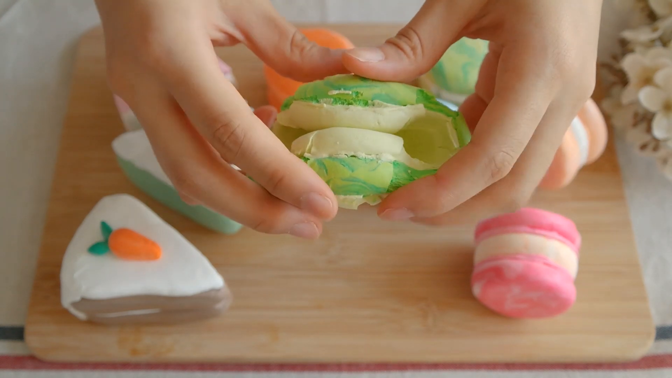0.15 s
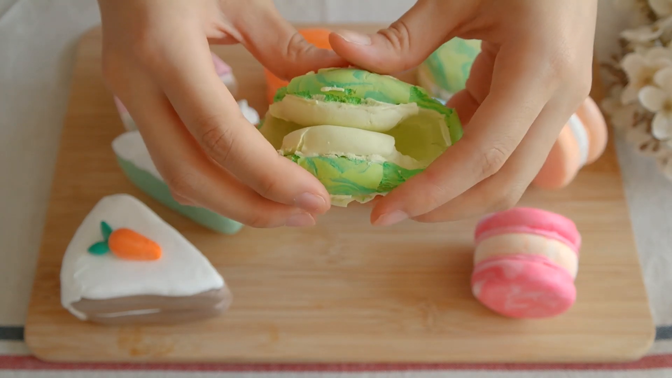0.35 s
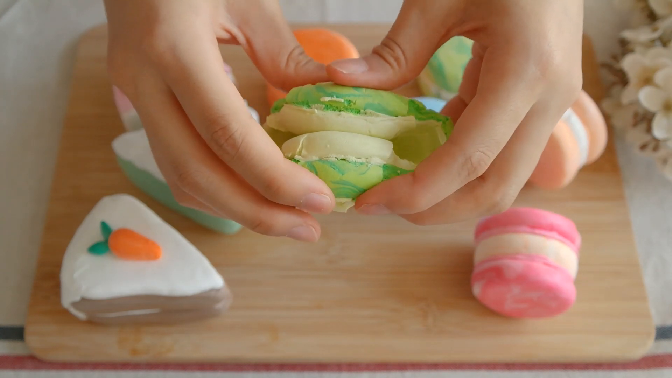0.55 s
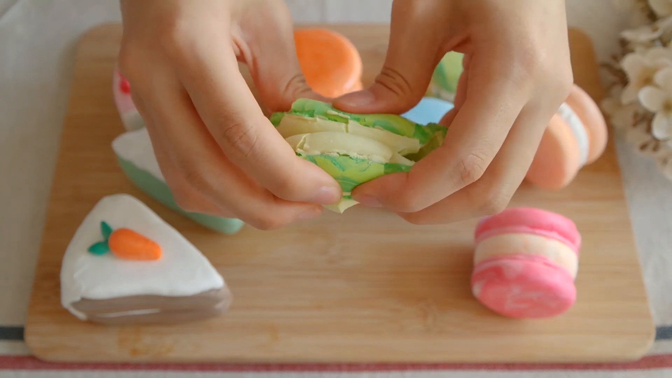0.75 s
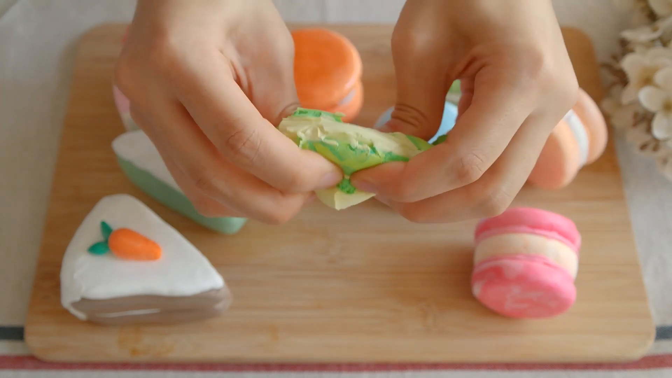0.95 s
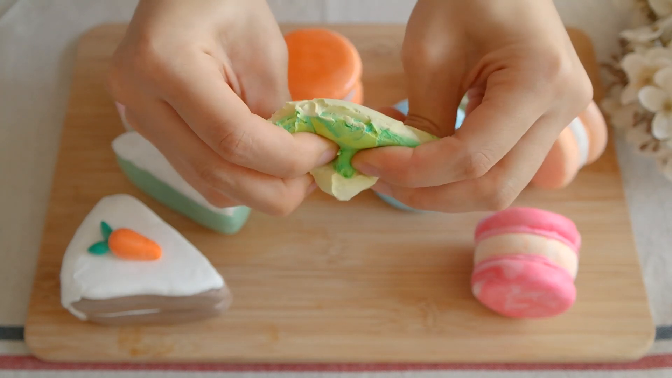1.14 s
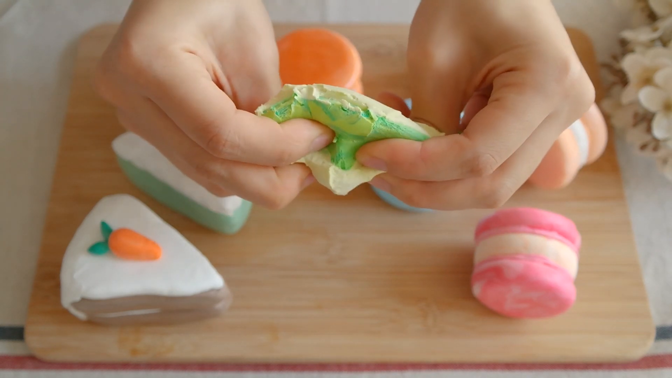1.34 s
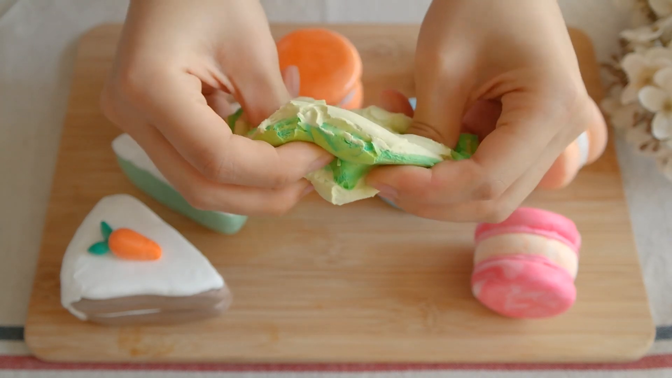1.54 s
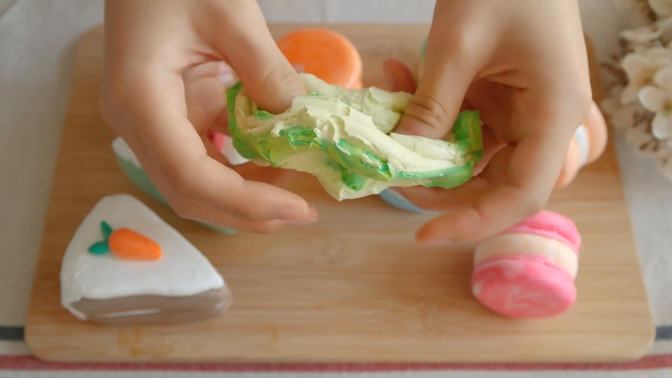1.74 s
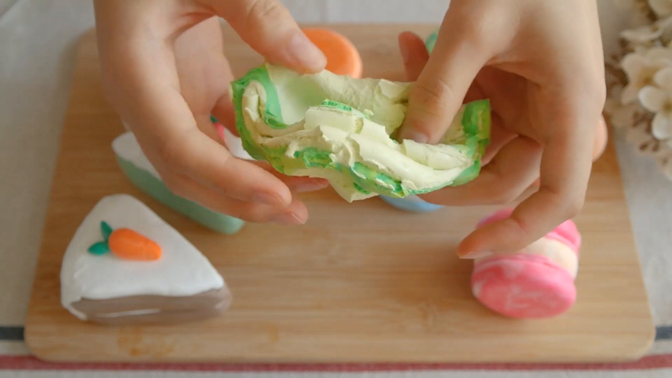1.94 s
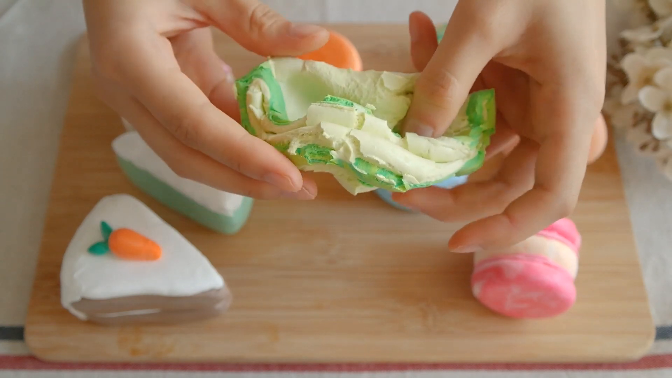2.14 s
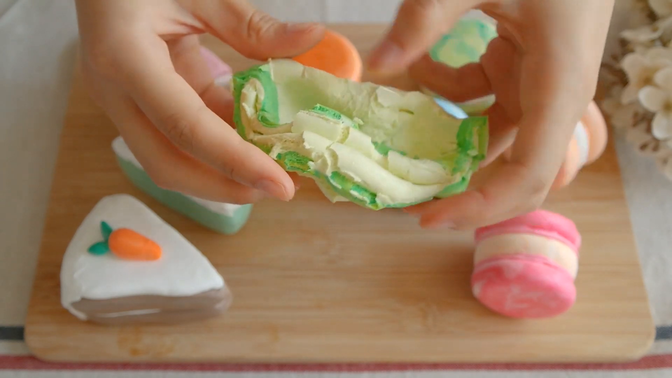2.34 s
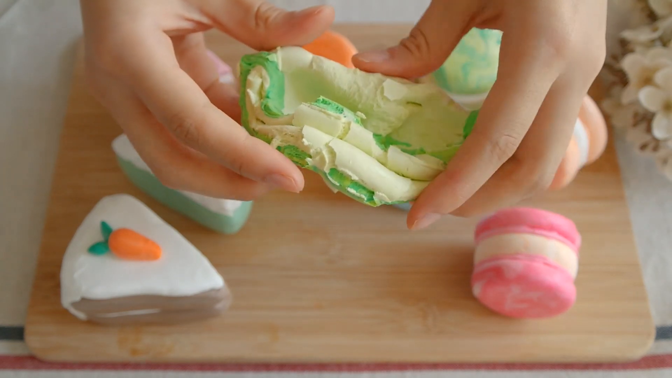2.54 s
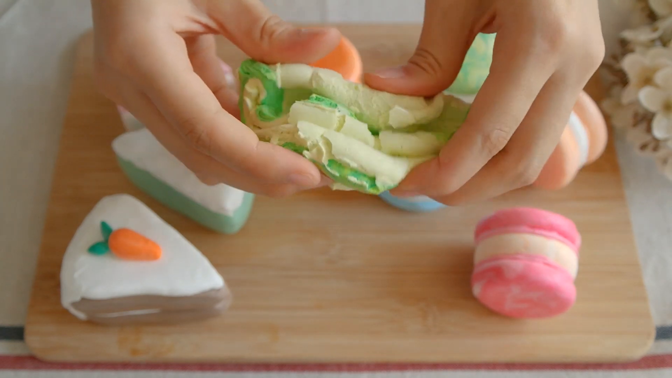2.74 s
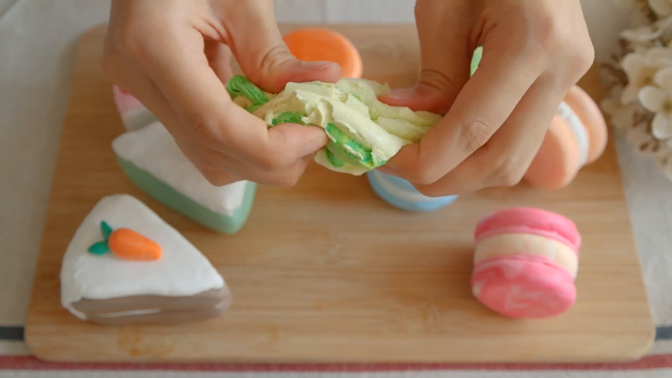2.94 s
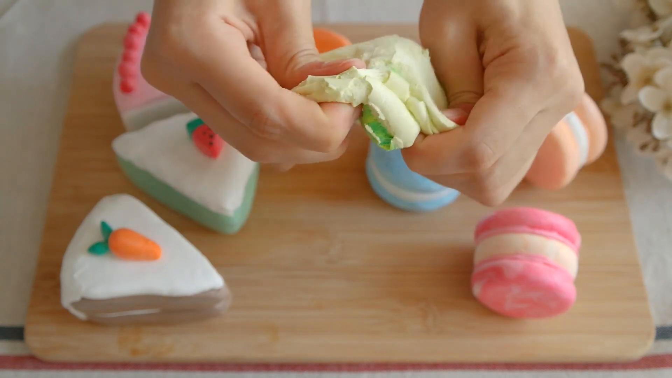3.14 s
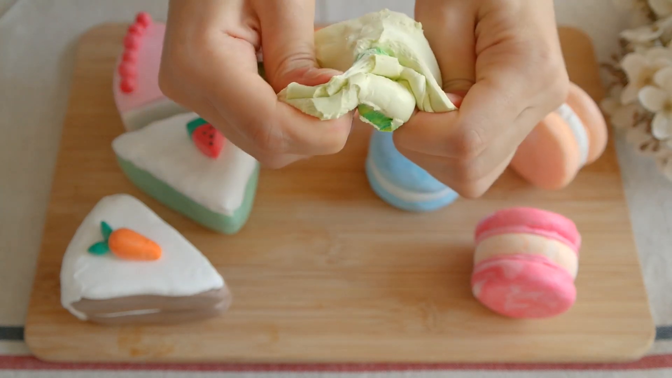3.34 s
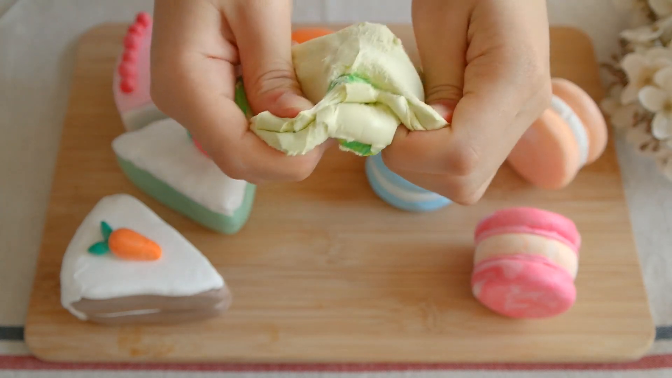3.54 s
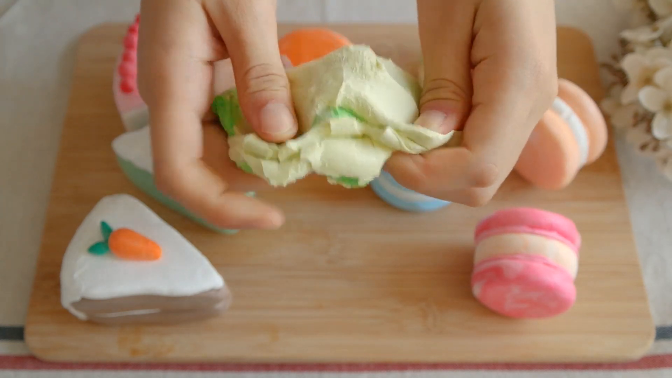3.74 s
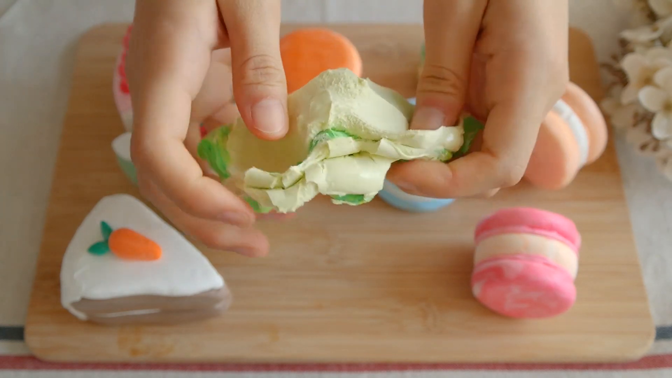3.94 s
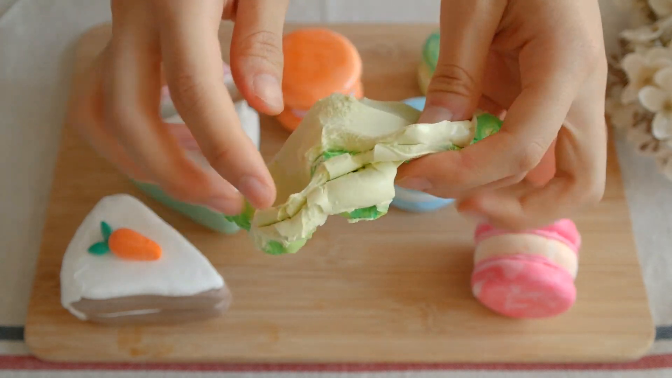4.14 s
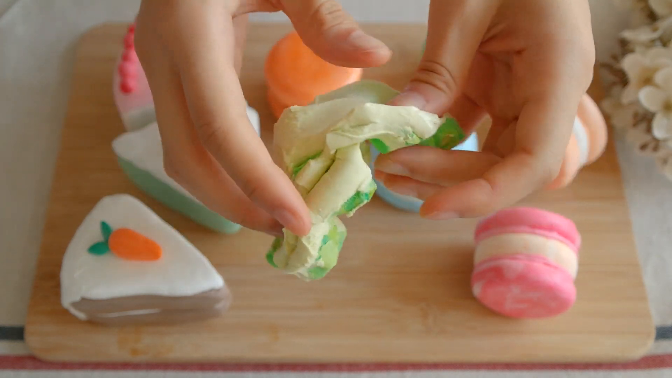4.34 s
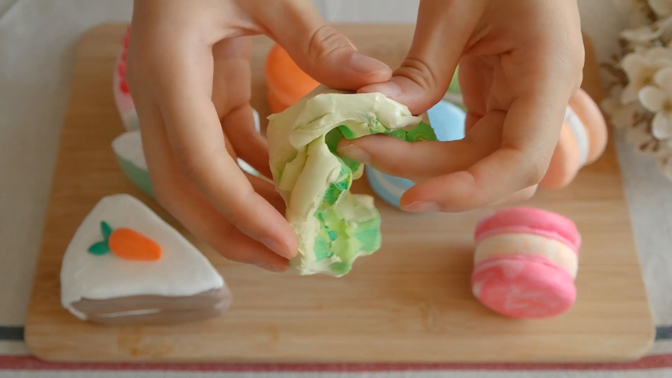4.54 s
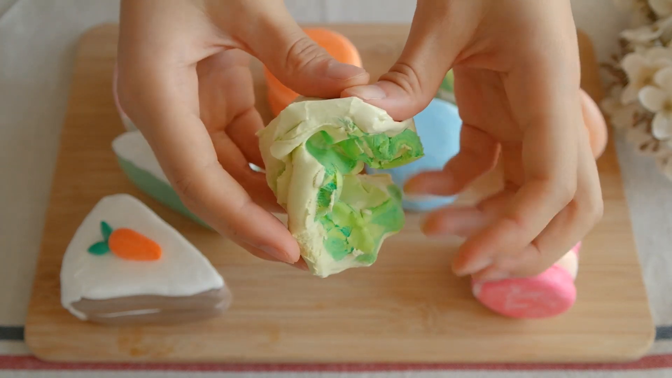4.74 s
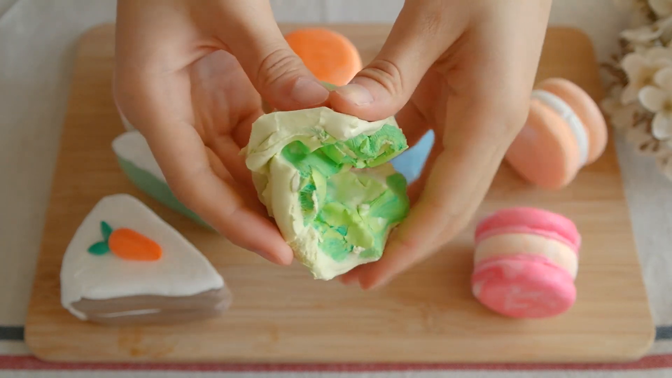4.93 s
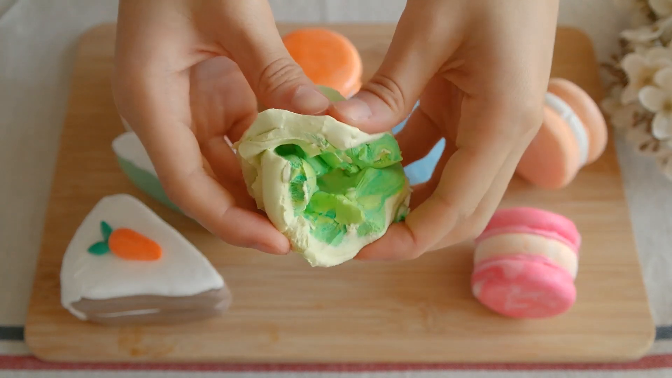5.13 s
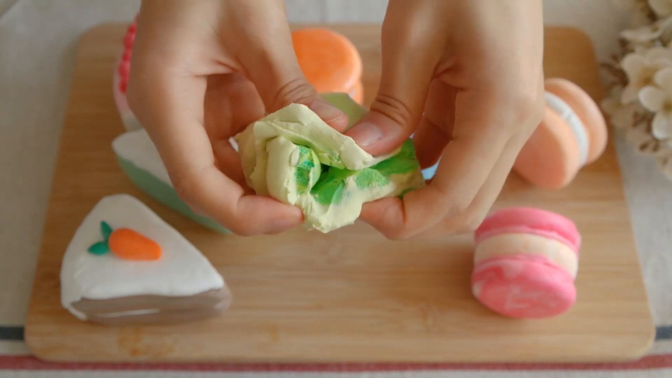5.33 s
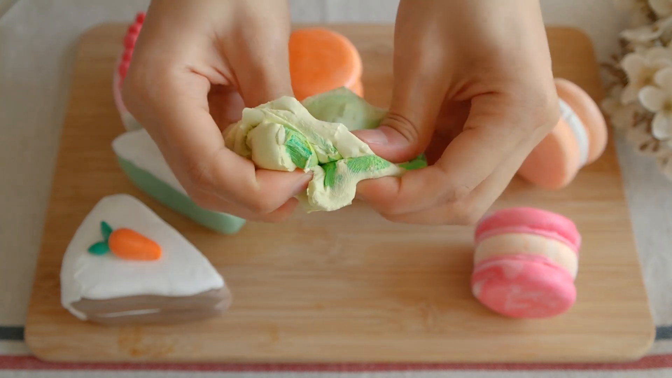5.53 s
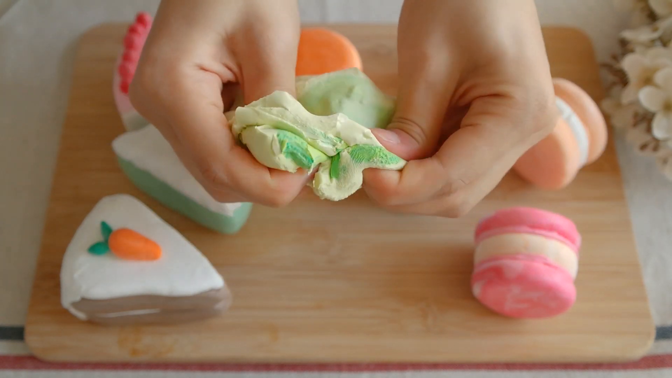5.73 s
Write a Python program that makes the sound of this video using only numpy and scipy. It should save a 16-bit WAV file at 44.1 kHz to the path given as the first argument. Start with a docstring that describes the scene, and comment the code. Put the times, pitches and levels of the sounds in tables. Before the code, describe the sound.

Close, crisp bursts of snapping and fine crumbly crackle as hands break crusted clay, with small hollow knocks, a brief creak and quiet pauses.

```python
"""At a table in a quiet room, a pair of microphones stands close to two hands working modelling clay.
Squeezing and folding break its dry, brittle crust: bursts of noise through three rings make the snaps.
Between them crumbs tick and skin hisses as coloured noise, and one fold creaks as a slowing run of pulses.
Low thuds and higher, hollow knocks are short damped swings; under the arms the table rumbles as low noise.
A faint room tail and steady room tone lie behind the hands."""
import sys
import numpy as np
from scipy import signal
from scipy.fft import rfft, irfft, next_fast_len
from scipy.io import wavfile

SR = 44100
rng = np.random.default_rng(int(sys.argv[2]) if len(sys.argv) > 2 else 0)


def unload_audio(sound):
    """Save the sound as a 16-bit wav file, at the path given as the first command line argument."""
    columns = np.transpose(np.atleast_2d(sound))
    # keep every value between -1 and 1, then stretch to whole-number steps
    steps = np.round(np.clip(columns, -1, 1) * 32767)
    wavfile.write(sys.argv[1], SR, steps.astype(np.int16))


N = 259308

# The fingers press or stroke the clay. Each row: full pressure in seconds, build-up in seconds,
# let-go in seconds, then levels in dB of bright rustle, dull rustle, table rumble and small snaps.
SQUEEZES = [(0.79, 0.097, 0.23, -65.5, -54.5, -66.5, -50), (0.99, 0.26, 0.32, -40, -43, -67, -37),
            (1.33, 0.6, 0.19, -55.5, -63, -78.5, -59.5), (1.56, 0.11, 0.22, -64.5, -77.5, -84, -78),
            (1.72, .14, 0.19, -54.5, -52.5, -50.5, -52.5), (1.86, 0.19, 0.15, -70.5, -67.5, -72, -81),
            (2.5, 0.28, 0.65, -80, -82.5, -75, -80), (2.92, 0.25, 0.58, -55, -58.5, -78.5, -50),
            (3.12, 0.17, 0.19, -37.5, -47.5, -66, -36), (3.32, 0.16, .14, -53.5, -64.5, -79.5, -54),
            (3.79, 0.16, .27, -53, -52.5, -56, -48.5), (4.3, 0.27, 0.23, -81.5, -85, -62.5, -81.5),
            (5.0, 0.17, 0.075, -73, -73.5, -49.5, -83), (5.17, 0.1, 0.064, -60.5, -72.5, -68, -78),
            (5.34, 0.31, 0.34, -72, -73, -74, -73), (5.52, 0.21, 0.35, -63, -56, -70.5, -60),
            (5.68, 0.58, 0.28, -47, -58, -91, -64)]
# Hands nearly still. One row: levels in dB of bright rustle, dull rustle, table rumble and small snaps.
REST_DB = (-84, -92, -74, -91.5)
SQUEEZE_DEPTH_DB = 40   # how far a squeeze's own level lies below its top at either end

# Brief scuffs of skin on the clay. Each row: height in seconds, swell in seconds,
# bright level in dB, dull level in dB.
SCUFFS = [(0.0, .01, -58.5, -59.5), (0.124, 0.014, -72, -64.5), (0.22, 0.0088, -61, -64),
          (0.37, 0.01, -67, -58.5), (0.557, 0.013, -77, -69), (1.662, 0.022, -49.5, -64),
          (1.781, 0.012, -51.5, -52), (1.945, 0.012, -68.5, -59), (1.963, 0.0079, -57.5, -50.5),
          (2.108, 0.0072, -57.5, -61), (2.421, 0.018, -71, -77), (2.55, 0.033, -77.5, -75),
          (2.612, 0.0078, -68, -83), (3.592, 0.029, -59, -75), (3.724, 0.022, -52.5, -54.5),
          (3.865, 0.014, -74, -53), (4.096, 0.0049, -74, -58), (4.108, 0.0059, -46, -48.5),
          (4.234, 0.0023, -55.5, -60.5), (4.266, 0.0045, -54, -58.5), (4.299, 0.006, -71, -60.5),
          (4.337, 0.0052, -61, -55.5), (4.505, 0.0033, -58, -71), (4.544, 0.015, -51.5, -58.5),
          (4.592, 0.019, -55.5, -54.5), (4.683, 0.011, -63, -68), (4.913, 0.005, -61, -77.5),
          (4.941, 0.017, -64, -72), (4.951, 0.0078, -49, -49)]
SCUFF_FADE_S = 0.011

# Colour of the bright rustle. Each row: frequency in Hz, relative density in dB per Hz.
BRIGHT_SPECTRUM = [(1760, -29.5), (3000, -9.5), (3360, -10.5), (4940, -10.5), (5700, -4), (9600, -2.5),
                   (14800, -16), (16500, -28.5)]
# Colour of the dull rustle. Each row: frequency in Hz, relative density in dB per Hz.
DULL_SPECTRUM = [(180, -48.5), (300, -12), (1190, -2), (1900, -3.5), (2710, 0.5), (3680, -15),
                 (5000, -15.5), (6500, -43), (11000, -120)]
# Colour of the room tone. Each row: frequency in Hz, relative density in dB per Hz.
AIR_SPECTRUM = [(12, -28.5), (20, 5.5), (60, 0), (200, -9), (551, -16), (772, -13), (1110, -15.5),
                (2510, -21), (3330, -26.5), (4790, -28.5), (8410, -26.5), (15200, -32), (16500, -40)]
AIR_DB = -71

# Low thuds and higher, hollow knocks, from about 40 to 2500 Hz. Each row: start in seconds,
# peak in dB before the left-right lean, frequency in Hz, left minus right in dB.
THUDS_AND_KNOCKS = [(0.212, -62.5, 87, 25), (0.359, -50, 40.6, 13), (1.04, -39, 444, 21),
                    (1.65, -45, 413, 16), (1.695, -36.5, 690, 11), (1.717, -41.5, 65.4, 26),
                    (1.737, -43.5, 157, 17), (1.768, -51, 52.3, 13), (1.938, -52, 111, 19),
                    (2.1, -49.5, 128, 17.5), (2.101, -49.5, 2500, 4.5), (2.114, -33.5, 2300, 4),
                    (2.372, -50, 39.6, 13.5), (3.011, -40.5, 463, 7), (3.779, -37.5, 634, 12),
                    (3.832, -51, 72.4, 8), (3.838, -22.5, 980, 7), (3.902, -31, 223, 9),
                    (3.903, -31, 1240, 7), (3.939, -47.5, 1480, 11), (4.0, -50, 1390, 8),
                    (4.113, -43, 1199, 2), (4.233, -30, 196, 10), (4.236, -32, 735, 7.5),
                    (4.556, -41, 810, -19), (4.956, -31.5, 453, 4.5), (4.956, -31.5, 1180, 11.5),
                    (4.263, -30, 53.3, 8.5), (4.3, -46, 1100, 5), (4.337, -40.5, 169, 10),
                    (4.499, -46, 130, 8), (4.951, -34.5, 138, 14), (4.998, -48, 60.5, 20),
                    (5.518, -44.5, 620, 8)]
ROCKING_LOW_HZ, ROCKING_HIGH_HZ = 100, 320   # swings between these push the two microphones in turn

# The clearer snaps of the crust. Each row: start in seconds, bright ring in dB, hollow body in dB,
# left minus right in dB before each ring's own lean.
SNAPS = [(0.6982, -56.5, -69, 1.0), (0.74, -48, -50.5, 1.5), (0.7635, -44, -50, 3),
         (0.7785, -35.5, -52.5, 6.5), (0.8036, -34.5, -39.5, 1.5), (0.811, -40.5, -42.5, 3),
         (0.8236, -36.5, -39, 1), (0.8327, -39.5, -33.5, 3), (0.8582, -39.5, -57.5, -2),
         (0.878, -29.5, -43.5, 4.0), (0.8896, -38, -56.5, 2.5), (0.8966, -38.0, -37.5, 4),
         (0.91, -32.5, -24, -0.5), (0.9163, -29.5, -30, 2.5), (0.9206, -24, -35.0, -1.0),
         (0.9269, -33.5, -34, 1.5), (0.9313, -25.5, -21.5, 2.5), (0.9519, -41, -41.5, -0.5),
         (0.9639, -33.5, -39, -3.0), (0.9729, -34.5, -45.5, 0.5), (0.9778, -38, -51, 0.5),
         (0.9864, -22.5, -28, -2.5), (1.0034, -29, -28.5, -1.0), (1.0071, -23, -38, 1.5),
         (1.0115, -26.5, -44, 1.5), (1.0405, -25.5, -16.5, 0.5), (1.0531, -31, -34, 2.5),
         (1.0676, -36, -42.5, 0.5), (1.0822, -37.5, -42.5, 0.5), (1.0974, -41.5, -49.5, -3.5),
         (1.103, -29.5, -56.5, 10), (1.1098, -17.5, -41, -3.5), (1.1431, -32.5, -36, 2),
         (1.1562, -30.0, -49.5, 3.5), (1.1786, -42, -59.5, 1), (1.2306, -38.5, -51, -4.5),
         (1.2433, -34, -44.5, 6), (1.2869, -42, -63, 4), (1.3252, -35, -58.5, 5),
         (1.341, -15.5, -34.5, 1.0), (1.4039, -36.0, -68, 2), (1.517, -47.5, -55.5, 2.5),
         (1.6412, -52.5, -48, 0.5), (1.6612, -33, -46, 0.5), (1.7179, -31, -41.5, 4),
         (2.114, -33, -54.5, -2.5), (2.7724, -54, -46, -0.5), (2.8029, -47, -45.5, 0), (2.831, -44, -59, 4),
         (2.8631, -58, -65, 1.0), (2.8757, -37.5, -32.5, 1.5), (2.8982, -32.5, -38, -4.5),
         (2.9089, -32, -56, 3), (2.9335, -29.5, -47, -1.5), (2.9521, -31, -49.5, 2.5),
         (3.0127, -33.0, -35.5, 1.5), (3.0371, -25.0, -33.5, -5), (3.0434, -27, -34.5, -3.5),
         (3.0521, -31, -49, 10), (3.0564, -20, -47.5, 2.5), (3.063, -28.5, -42.5, 9.5),
         (3.088, -22.5, -34.5, 0.5), (3.0945, -41.5, -52.5, -1.5), (3.1005, -20, -33, 6),
         (3.1089, -38.5, -49, -1), (3.114, -19, -35, -1.5), (3.1397, -17, -31.5, -2.5),
         (3.144, -34.5, -55.5, -12.5), (3.1489, -24, -37.5, 2.0), (3.1556, -25, -45.5, -3.5),
         (3.1605, -19.5, -38.5, -1.5), (3.1694, -24, -42.5, 1.5), (3.2045, -36.5, -65, -5),
         (3.2202, -23.5, -47.5, 4.5), (3.252, -32, -51.5, -2.0), (3.2771, -27.5, -50, -5),
         (3.2817, -29, -62, 11), (3.2961, -26.5, -72, 7), (3.2984, -31, -55, -10), (3.3094, -60, -54, 4),
         (3.3227, -30.5, -57.0, -2), (3.3288, -37, -60, -2), (3.3736, -35.5, -87, -2), (3.78, -50, -42, -2),
         (3.8385, -37.5, -37.5, -5), (4.5554, -41, -41, 5), (4.9525, -34.5, -60, -10.5),
         (4.9566, -41.5, -47, -6), (5.1412, -27.5, -38, -1.5), (5.2434, -42.5, -55.5, 1),
         (5.3483, -46, -70, 0.0), (5.4014, -45.5, -48.5, 6.5), (5.4466, -36, -49, 3),
         (5.4652, -54, -60.0, -3), (5.4775, -31, -44.0, 3), (5.5084, -28.5, -43.5, 4),
         (5.5292, -33.0, -52, 3), (5.5548, -40, -67, 1), (5.5671, -31.5, -38.5, -2),
         (5.579, -20.5, -34, -0.5), (5.5888, -24, -50.0, 2), (5.6177, -37.5, -40.5, -2),
         (5.6541, -26.5, -40, 2), (5.6753, -22.5, -30.5, -3), (5.7011, -46, -51, 0.0),
         (5.7314, -38.0, -74, -3), (5.7584, -23.5, -43, 0), (5.7811, -30.5, -55, 2)]
# How the crust rings: bright, middle, hollow. Each row: frequency in Hz, width of the first resonance
# in Hz, time for the splinters to fall 60 dB in seconds, left-right likeness from 0 to 1,
# lean to the left in dB.
RINGS = [(8370, 4400, 0.0078, 0.6, -2.5), (3350, 5070, 0.011, 0.3, 5), (1040, 1710, 0.017, 0.88, 8.5)]
MIDDLE_DB, MIDDLE_SPREAD_DB = -2, 3.5   # the middle ring lies about halfway between the other two
CRACKLES_PER_S = 50   # small snaps
CRACKLE_SPREAD_DB, CRACKLE_COLOUR_DB, CRACKLE_HOLLOW_DB = 4.0, 5.5, -4

# A fold slipping ever more slowly. Each row: time in seconds, slips so far, slip peak in dB
# before random spread and left-right gains.
CREAK = [(5.2671, 0, -66), (5.3246, 19, -50), (5.3388, 23, -46), (5.3619, 28, -41), (5.3826, 32, -38),
         (5.3941, 34, -38), (5.4107, 36, -39), (5.4347, 38, -39)]
CREAK_HZ, CREAK_WIDTH_HZ = 1120, 1200
SLIP_JITTER_S, SLIP_SPREAD_DB = 0.00016, 1.3

ROOM_T60_S, ROOM_DB = 0.33, -25
CUTOFF_HZ = 17000


def from_db(db):
    """Decibels to gain."""
    return 10 ** (np.asarray(db) / 20)


def rms_one(x):
    """Scale to unit rms."""
    return x / np.sqrt(np.mean(x ** 2) + 1e-30)


def sides(left_db):
    """Left and right gains, as a column, for a level difference in dB."""
    return from_db([[left_db / 2], [-left_db / 2]])


def resonate(x, hz, width_hz):
    """Two-pole resonance along the last axis."""
    r = np.exp(-np.pi * width_hz / SR)
    poles = [2, -4 * r * np.cos(2 * np.pi * hz / SR), 2 * r * r]
    return signal.lfilter([1 - r * r, 0, r * r - 1], poles, x)


def band(x, low_hz, high_hz):
    """Keep the sound between two frequencies."""
    return signal.sosfilt(signal.butter(2, [low_hz, high_hz], "band", fs=SR, output="sos"), x)


def colour(x, spectrum):
    """Shape noise to a spectrum, interpolated over log frequency; overall rms 1."""
    size = next_fast_len(N)
    hz = np.maximum(np.arange(size // 2 + 1) * SR / size, 1)
    points = np.array(spectrum)
    gain = from_db(np.interp(np.log(hz), np.log(points[:, 0]), points[:, 1]))
    return rms_one(irfft(rfft(x, size) * gain, size)[..., :N])


def stereo(shared, own, alike):
    """Two channels from a shared part and a part of their own."""
    alike = np.clip(alike, 0, 1)
    return alike * shared + np.sqrt(1 - alike ** 2) * own


def stereo_noise(alike):
    """White noise at two microphones, partly shared between them."""
    return stereo(rng.standard_normal(N), rng.standard_normal((2, N)), alike)


def room_tone():
    """Steady coloured noise of the quiet room, separate at each microphone."""
    return from_db(AIR_DB) * colour(rng.standard_normal((2, N)), AIR_SPECTRUM) * sides(0.77)


def pressure():
    """Each squeeze is a rounded hump in dB, and humps add as power; levels of the four squeezed sounds."""
    t = np.arange(N) / SR
    power = from_db(REST_DB)[:, None] ** 2 * np.ones(N)
    for s, rise_s, fall_s, *db in SQUEEZES:
        hump_db = -SQUEEZE_DEPTH_DB * ((t - s) / np.where(t < s, rise_s, fall_s)) ** 2
        power = power + from_db(db)[:, None] ** 2 * from_db(np.maximum(hump_db, -100)) ** 2
    return 10 * np.log10(power)


def scuffs():
    """Each scuff swells smoothly and fades exponentially; power for the bright and the dull hiss."""
    power, t = np.zeros((2, N)), np.arange(N) / SR
    for s, swell_s, *db in SCUFFS:
        near = slice(max(round((s - 3 * swell_s) * SR), 0), round((s + 0.15) * SR))
        age = t[near] - s
        shape = np.exp(-np.where(age < 0, (age / swell_s) ** 2, age / SCUFF_FADE_S))
        power[:, near] += (from_db(db)[:, None] * shape) ** 2
    return power


def rustle(level_db, scuff_power, spectrum, per_s, spread_db, smooth, alike):
    """Crumbs tick at random with uneven sizes over the smooth hiss of sliding skin; scuffs are hiss alone."""
    sizes = from_db(spread_db * np.minimum(rng.exponential(1, N), 4))
    strikes = sizes * (rng.random(N) < per_s / SR)
    ticks = signal.lfilter([1], [1, -0.9], strikes)   # each tick lasts a moment
    grain = rms_one(smooth + rms_one(ticks))
    crumbs = colour(grain * stereo_noise(alike), spectrum)
    hiss = colour(stereo_noise(alike), spectrum)
    hiss = rms_one(signal.lfilter([1], [1, -0.85], hiss))   # skin is softer than crust: scuffs sound duller
    return from_db(level_db) * crumbs + np.sqrt(scuff_power) * hiss


def rumble(level_db):
    """Low wobble of the table under the arms, stronger on the left; its upper part rocks the sides in turn."""
    deep = band(stereo_noise(0.72), 28, 90)
    rock = band(stereo_noise(0.81) * [[1], [-1]], 90, 300)
    return from_db(level_db) * (rms_one(deep) + from_db(-2.0) * rms_one(rock)) * sides(2.9)


def thuds_and_knocks(cycles):
    """A thud or knock swings four cycles, decaying 60 dB per given number of cycles."""
    out = np.zeros((2, N))
    for s, peak_db, hz, left_db in THUDS_AND_KNOCKS:
        turns = np.arange(round(4 * SR / hz)) * hz / SR
        swing = -np.sin(2 * np.pi * turns) * from_db(-60 * turns / cycles)
        swing = swing * (1 - np.exp(-turns / 0.11))   # rounded onset
        swing = swing / np.abs(swing).max()
        right_sign = -1 if ROCKING_LOW_HZ < hz < ROCKING_HIGH_HZ else 1   # a tilting table
        gains = from_db(peak_db) * sides(left_db) * [[1], [right_sign]]
        at = round(s * SR)
        out[:, at:at + len(swing)] += gains * swing
    return out


def crackles(snap_db, dullness_db):
    """Small snaps at random moments, hollower where the rustle is dull; rows like those of the clear snaps."""
    when, size = rng.random((round(CRACKLES_PER_S * N / SR), 2)).T
    colour_db, place_db = rng.standard_normal((len(when), 2)).T
    at = (when * (N - 1)).astype(int)
    bright_db = snap_db[at] - CRACKLE_SPREAD_DB * np.log(np.maximum(1 - size, 0.05))   # a few stand out
    hollow_db = bright_db + dullness_db[at] + CRACKLE_HOLLOW_DB + CRACKLE_COLOUR_DB * colour_db
    return np.transpose([at / SR, bright_db, hollow_db, 1.5 * place_db])


def with_middle(rows):
    """Add the level of the middle ring, scattered about a level between its neighbours."""
    s, bright_db, hollow_db, left_db = np.transpose(rows)
    scatter_db = MIDDLE_SPREAD_DB * rng.standard_normal(len(s))
    middle_db = (bright_db + hollow_db) / 2 + MIDDLE_DB + scatter_db
    return np.transpose([s, bright_db, middle_db, hollow_db, left_db])


def snaps(rows):
    """A sharp break, then splinters that die within milliseconds, heard through each ring of the crust."""
    rows, size = np.array(rows), 400
    age = np.arange(size) / SR
    chance = rng.standard_normal((len(rows), 3, 3, size))   # snap, ring, shared/left/right, time
    out = np.zeros((2, N + 2 * size))
    for k, (hz, width_hz, t60, alike, lean_db) in enumerate(RINGS):
        unevenness = np.abs(chance[:, 0, :1])   # splinters come unevenly, alike in all rings
        force = chance[:, k] * unevenness * from_db(-60 * age / t60)
        force[:, 0, 0] = 11   # the break itself outweighs the splinters
        force = stereo(force[:, :1], force[:, 1:], alike)
        sound = resonate(resonate(force, hz, width_hz), hz, 1.35 * width_hz)
        for (s, *db, left_db), burst in zip(rows, sound):
            at = round(s * SR) + np.arange(size)
            early_rms = np.sqrt(np.mean(burst[:, :110] ** 2))   # level over the first 2.5 ms
            burst = from_db(db[k]) * sides(left_db + lean_db) * burst / early_rms
            out[0, at] += burst[0]
            out[1, at + 1] += burst[1]   # the right microphone is a little farther away
    return out[:, :N]


def creak():
    """Stick and slip: one slightly uneven pulse per slip into the hollow of the fold."""
    s, so_far, peak_db = np.transpose(CREAK)
    when = np.interp(np.arange(1, so_far[-1] + 1), so_far, s)
    late, size = rng.standard_normal((len(when), 2)).T
    at = ((when + SLIP_JITTER_S * late) * SR).astype(int)
    slips = np.zeros(N)
    slips[at] = from_db(np.interp(when, s, peak_db) + SLIP_SPREAD_DB * size)
    pulse = np.eye(1, 300)[0]   # a single click
    for _ in range(3):   # made soft and hollow, with steep skirts
        pulse = resonate(pulse, CREAK_HZ, CREAK_WIDTH_HZ)
    return np.convolve(slips, pulse / np.abs(pulse).max())[:N] * from_db([[1.5], [-5.0]])


def room(x):
    """A faint diffuse tail of decaying noise, unlike in the two channels."""
    age = np.arange(SR // 3) / SR
    tail = rng.standard_normal((2, len(age))) * from_db(-60 * age / ROOM_T60_S) * (age > 0.003)
    tail = signal.lfilter([1], [1, -0.5], tail)   # walls dull the sound
    tail = tail / np.sqrt(np.sum(tail ** 2) / 2)
    return from_db(ROOM_DB) * signal.fftconvolve(x.mean(axis=0)[None], tail)[:, :N]


def scene():
    """Clay with its room tail, thuds, knocks and rumble, and room tone."""
    bright_db, dull_db, rumble_db, snap_db = pressure()
    bright_scuffs, dull_scuffs = scuffs()
    bright = rustle(bright_db, bright_scuffs, BRIGHT_SPECTRUM,
                    per_s=1500.0, spread_db=9.5, smooth=0.6, alike=0.7)
    dull = rustle(dull_db, dull_scuffs, DULL_SPECTRUM,
                  per_s=500.0, spread_db=5.0, smooth=0.45, alike=0.95)
    small_snaps = snaps(with_middle(crackles(snap_db, dull_db - bright_db)))
    clear_snaps = snaps(with_middle(SNAPS))
    clay = bright + dull * sides(1.1) + small_snaps + clear_snaps + creak()
    return clay + room(clay) + thuds_and_knocks(cycles=6.04) + rumble(rumble_db) + room_tone()


def record(dry):
    """The microphones lift the highest treble; the top of the band is cut."""
    lifted = dry + from_db(6.0) * resonate(dry, 19000, 3000)
    return signal.sosfilt(signal.cheby2(22, 75, CUTOFF_HZ, fs=SR, output="sos"), lifted)


dry = scene()
out = record(dry)
unload_audio(out)
```